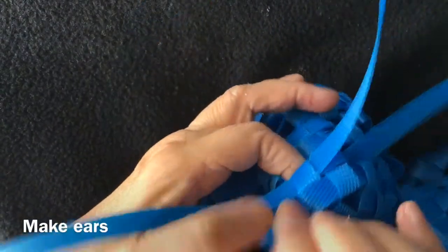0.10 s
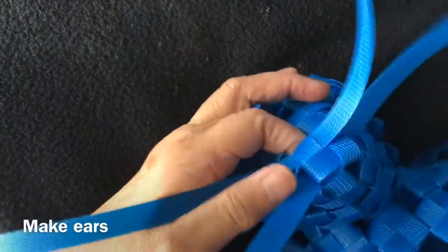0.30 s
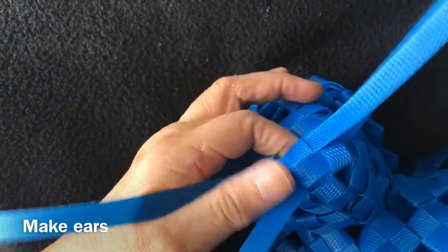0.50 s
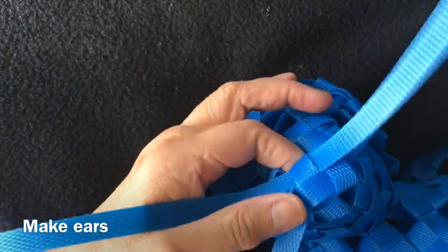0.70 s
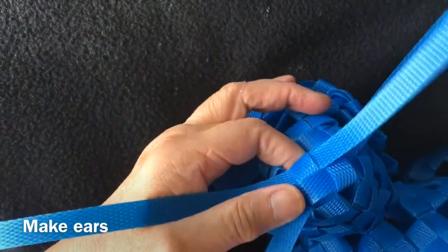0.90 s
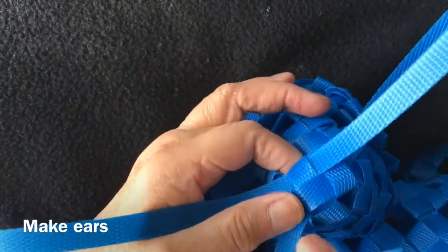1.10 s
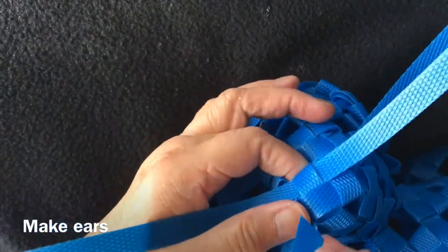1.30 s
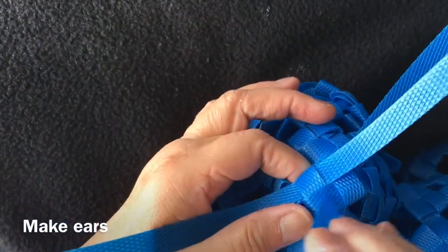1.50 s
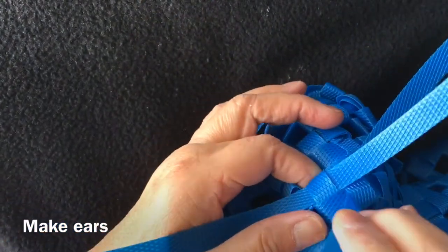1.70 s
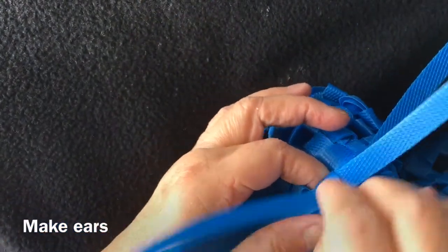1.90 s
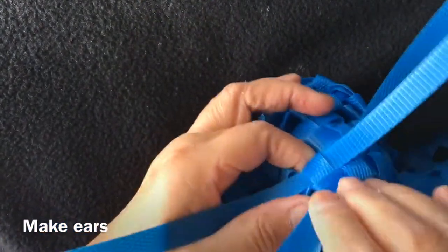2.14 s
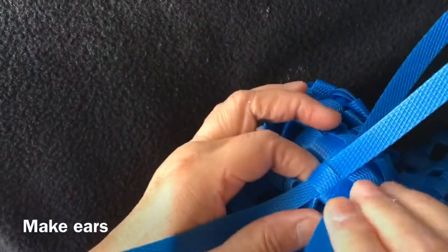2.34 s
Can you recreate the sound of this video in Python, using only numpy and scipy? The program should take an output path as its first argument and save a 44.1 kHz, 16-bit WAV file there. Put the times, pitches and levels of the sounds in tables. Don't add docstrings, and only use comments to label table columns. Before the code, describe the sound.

Ribbed plastic strapping rasps quickly through woven strips, then scattered ticks and a few hard cracks

```python
import sys
import numpy as np
from scipy import signal
from scipy.fft import rfft, irfft
from scipy.io import wavfile
from scipy.ndimage import uniform_filter1d

SR = 44100
rng = np.random.default_rng(int(sys.argv[2]) if len(sys.argv) > 2 else 0)


def wav_record(signal):
    frames = np.transpose(np.atleast_2d(signal))
    bounded = np.clip(frames, -1, 1)
    quanta = np.round(bounded * 32767).astype(np.int16)
    wavfile.write(sys.argv[1], SR, quanta)


def rack_gain(trim_db):
    fader = np.asarray(trim_db, float)
    return 10 ** (fader / 20)


N = 105840

# (mode_hz, width_hz, level_db)
STRIP_MODES = [(1220, 120, 4.5), (1650, 110, -9.5), (2200, 1400, -2.5), (4300, 610, -1.5), (6550, 470, 6),
               (9250, 520, 3)]


def unit_rms(x):
    return x / np.sqrt(np.mean(x ** 2) + 1e-20)


def curve(points, t):
    return np.interp(t, *np.transpose(points))


def coloured(x, points):
    hz = np.fft.rfftfreq(len(x), 1 / SR)
    point_hz, point_db = np.transpose(points)
    gain_db = np.interp(np.log(hz + 1), np.log(point_hz + 1), point_db)
    return irfft(rfft(x) * rack_gain(gain_db), len(x))


def ring(x, hz, width):
    return signal.lfilter(*signal.iirpeak(min(hz, SR / 2.2), hz / width, SR), x)


def wander(count, hz):
    span = int(SR / hz)
    return unit_rms(uniform_filter1d(uniform_filter1d(rng.standard_normal(count), span), span))


def grit(count, spread_db):
    fast_db = spread_db * wander(count, 1500)
    slow_db = .5 * spread_db * wander(count, 100)
    return rng.standard_normal(count) * rack_gain(fast_db + slow_db)


def pull():
    # (time_s, rib_rate_hz)
    rib_rate = [
        (.245, 200),
        (.285, 240),
        (.325, 275),
        (.35, 268),
        (.367, 251),
        (.39, 264),
        (.41, 303),
        (.48, 309),
        (.52, 280),
    ]
    # (time_s, level_db)
    pressure = [
        (.19, -62),
        (.222, -47),
        (.245, -35),
        (.31, -36),
        (.39, -31.5),
        (.49, -35),
        (.542, -39),
        (.553, -50),
        (.562, -43),
        (.574, -56),
    ]
    # (start_s, length_s, [(rib_rate_multiple, level_db)])
    even_catches = [
        (.245, .09, [(2, -43), (3, -44), (5, -48)]),
        (.272, .052, [(1, -39)]),
        (.305, .05, [(2, -45), (4, -43), (6, -39)]),
        (.352, .043, [(3, -43), (5, -39), (7, -42), (8, -42)]),
        (.393, .097, [(2, -39), (4, -39)]),
        (.405, .06, [(6, -43), (7, -39), (8, -46)]),
        (.43, .08, [(1, -49), (9, -47)]),
        (.48, .065, [(2, -50), (3, -48), (5, -44), (6, -45), (7, -44)]),
    ]
    # (hz, level_db)
    scrape_spectrum = [(100, -21), (300, -15), (800, -13), (1300, -6), (2500, -9), (4000, -13),
                       (12000, -16.5), (16000, -20)]
    t = np.arange(N) / SR
    moving = (t > pressure[0][0]) & (t < pressure[-1][0])
    rib_turns = np.cumsum(curve(rib_rate, t) * (1 + .011 * wander(N, 300))) / SR

    buzz = np.zeros(N)
    for start_s, length_s, tones in even_catches:
        swell = np.sqrt(np.sin(np.pi * np.clip((t - start_s) / length_s, 0, 1)) + 1e-9)
        for multiple, level_db in tones:
            level = rack_gain(level_db + 1.2 * wander(N, 50))
            buzz += swell * level * np.cos(2 * np.pi * (multiple * rib_turns + rng.random()))

    slips = grit(N, 1.2) * (1 + 0.37 * np.cos(2 * np.pi * rib_turns))
    slips = slips + sum(rack_gain(db + 4 * wander(N, 50)) * ring(slips, hz, width) for hz, width, db in STRIP_MODES)
    scrape = rack_gain(curve(pressure, t) - 0.04) * unit_rms(coloured(slips, scrape_spectrum))
    return moving * (scrape + buzz)


def struck(s, peak_db, modes):
    lead = 400
    t = (np.arange(1900) - lead) / SR
    lead_in = rack_gain(-35) * np.exp(np.minimum(t, 0) / .003)
    rustle_db = -21 - 0.45 * (peak_db + 32.0)
    rustle = rack_gain(rustle_db) * np.exp(-np.maximum(t, 0) / .0028)
    kick = (t == 0) + rng.standard_normal(len(t)) * np.where(t < 0, lead_in, rustle)
    x = rack_gain(-9) * unit_rms(kick)
    for k, (hz, width, db) in enumerate(sorted(modes)):
        x = x + (-1) ** k * rack_gain(db) * unit_rms(ring(ring(kick, hz, width), hz, width))
    return s - lead / SR, rack_gain(peak_db + 1.0) * x / abs(x).max()


def snap(s, peak_db, ring_hz, body_hz, body_db):
    # (mode_hz, width_hz)
    face_modes = [(2500, 8100), (4200, 900), (6400, 580), (7700, 900), (9400, 1900), (11800, 800),
                  (14500, 1400)]
    detune, uneven_db = .05, 4
    chance = 2 * rng.random((7, 2)) - 1
    modes = [(ring_hz, ring_hz / 4, 2),
             (body_hz, 200 + body_hz / 3, body_db),
             (body_hz / 2, 900, body_db - 14)]
    for (hz, width), (louder, higher) in zip(face_modes, chance):
        modes.append((hz * (1 + detune * higher), 1.7 * width, -4 + uneven_db * louder))
    return struck(s, peak_db, modes)


def rub(start, length, db, tilt_db):
    count = round(length * SR)
    arch = np.sin(np.pi * np.linspace(0, 1, count) ** .7) ** 1.4
    x = grit(8192, 2.1)
    x = x + sum(rack_gain(mode_db - 9 + 7 * wander(8192, 40)) * ring(x, hz, width)
                for hz, width, mode_db in STRIP_MODES)
    x = coloured(x, [(250, -0.5), (1000, -4 - 2 * tilt_db), (4000, -8.0),
                     (9000, -13.5 + tilt_db), (16000, -20.5 + 2 * tilt_db)])
    return start, rack_gain(db) * unit_rms(x)[:count] * arch


def bump(s, db, hz):
    u = np.arange(4000) / SR * hz / 1.8
    return s, rack_gain(db) * np.e * u * np.exp(-u) * np.sin(2 * np.pi * 1.9 * u)


def room(x):
    t60_s = .05
    taps, at = np.zeros(8000), np.arange(100, 7980, 20)
    taps[at + rng.integers(0, 20, len(at))] = rng.choice([-1., 1.], len(at))
    taps *= rack_gain(-60 * np.arange(8000) / SR / t60_s)
    return signal.fftconvolve(x, taps / np.linalg.norm(taps))[:N]


def air():
    # (hz, level_db)
    air_spectrum = [(25, -33), (55, -1), (170, -1), (350, -11.5), (1000, -22.5), (3000, -29.5),
                    (14200, -35.5), (15300, -54)]
    level_db = -66 + wander(N, 21)
    return rack_gain(level_db) * unit_rms(coloured(rng.standard_normal(N), air_spectrum))


def add(mix, s, sound):
    part = mix[round(s * SR):][:len(sound)]
    part += sound[:len(part)]


def scene():
    # (time_s, peak_db,
    # ring_hz, body_hz, body_db)
    pull_snaps = [(.199, -38, 5000, 2200, 4), (.2226, -27, 7300, 1250, 4), (.2272, -19, 10500, 1300, -1),
                  (.2368, -12, 7200, 1500, -5), (.2388, -10.5, 12500, 2800, -1),
                  (.2405, -11, 9500, 1100, 3), (.2435, -16, 6800, 1900, 0), (.36, -23, 9500, 1800, -3),
                  (.367, -23, 10000, 1800, -6), (.383, -21, 6500, 1300, -6), (.387, -13, 6500, 1500, -4),
                  (.395, -16, 9500, 2400, -8), (.4985, -18, 9000, 2000, -3), (.519, -28, 4500, 2000, 0),
                  (.535, -22, 6500, 2000, -8), (.5455, -22, 6500, 1000, -5), (.561, -29, 6000, 1150, 4),
                  (.567, -30, 5000, 2200, 4)]
    weave_snaps = [(0.0748, -44.5, 8700, 2560, 3.5), (.121, -48, 5950, 1450, 14),
                   (0.135, -42.5, 4600, 2450, 11), (0.143, -44, 5600, 1930, 9),
                   (.164, -46, 6000, 2450, -7.5), (0.172, -53.5, 7000, 2970, 4),
                   (0.612, -48, 7050, 1800, -10), (.636, -37.5, 6240, 1570, 14.5),
                   (.698, -46, 5040, 1410, 11), (1.098, -36, 10940, 2050, 2), (1.101, -48, 11000, 1973, 1),
                   (1.2048, -46, 3740, 2540, 11), (1.2221, -33, 5400, 3530, 3),
                   (0.746, -40.5, 5980, 2360, 5), (.776, -41, 5770, 1120, 8),
                   (0.781, -43.5, 6600, 2200, 7.5), (.879, -49.5, 4200, 1740, 9.5),
                   (0.924, -55.5, 4140, 1500, -6), (0.954, -57.5, 6100, 1420, 7),
                   (1.277, -52, 3850, 2200, 0),
                   (1.556, -47.5, 5850, 1210, 4.5), (1.581, -58, 4300, 1150, 10),
                  (1.6224, -48.5, 5800, 1300, 8.5), (1.632, -54, 5930, 1130, 10),
                  (1.646, -54, 4300, 1100, -8), (1.6491, -42, 6170, 1200, 1.5),
                  (1.651, -56, 4300, 1594, -21), (1.657, -65, 7440, 1220, -5),
                  (1.872, -55.5, 6000, 1080, -4), (1.897, -56, 6000, 1060, 6), (2.054, -61, 3950, 1500, 4),
                  (2.081, -56, 9250, 4290, 4), (1.919, -42.5, 7200, 1990, 6.5), (1.929, -64, 6000, 1470, 1),
                  (2.177, -45, 12500, 5500, -19)]
    # (time_s, peak_db, [(mode_hz, width_hz, level_db)])
    cracks = [
        (.6835, -16.5, [(1330, 560, -8.5), (2200, 400, -3.5), (2810, 520, -4.5), (4170, 900, -16), (7080, 2200, 4.5), (11660, 1660, 1), (13400, 1400, -5)]),
        (1.151, -19.5, [(900, 2700, -13.5), (2110, 670, -2.5), (4340, 970, -2.5), (6100, 1070, 1.5), (7400, 1000, -4), (8820, 1400, -7.5), (12100, 1200, -8), (13500, 780, -9)]),
        (1.2115, -20, [(1200, 450, -8), (3050, 330, -7.5), (3970, 870, -4.5), (7140, 970, -14), (9100, 1160, 3), (11060, 1100, -4), (12700, 1600, -7), (15000, 1200, -9)]),
        (2.039, -45.5, [(1220, 1500, -7.5), (3870, 900, -13), (6150, 690, -6.5), (7400, 550, 2), (9400, 600, -18), (11800, 1000, -8), (14100, 1200, -13)]),
        (2.164, -26, [(1220, 570, -14), (2300, 730, -6), (3800, 830, -3), (5710, 650, -2.5), (7100, 540, -8), (8440, 920, -1.5), (9470, 1300, -3), (13850, 2100, 7), (15300, 960, -6)]),
    ]
    # (start_s, length_s, level_db, treble_tilt_db)
    rubs = [(0, 0.078, -67, 2.5), (.06, 0.13, -66, 2), (.108, 0.0634, -57.5, -3), (.185, 0.06, -54, 0.5),
            (.555, 0.12, -58, 0), (.672, 0.044, -49.5, 4), (.71, .035, -65, 5), (.73, 0.12, -65.5, 0),
            (.865, 0.13, -66, 2.5), (1.085, 0.039, -58, -3.5), (1.11, 0.14, -65, 2),
            (1.17, 0.12, -61.5, 5.5), (1.197, 0.037, -46, 2.5), (1.268, 0.064, -63.5, 2.5),
            (1.3, 0.12, -68, 3), (1.565, 0.055, -68.5, 6), (1.615, 0.016, -63, -2.5),
            (1.642, 0.03, -62.5, -0.5), (1.86, 0.037, -66.5, -1), (1.895, 0.06, -60.5, 1),
            (1.95, 0.15, -71.5, 2.5), (2.085, 0.1, -68.5, 1.5), (2.162, 0.032, -66, 4),
            (2.365, 0.051, -70, 3)]
    # (time_s, level_db, pitch_hz)
    bumps = [(.225, -47, 170), (.47, -50, 97), (.49, -52, 62), (.508, -51, 240), (.536, -46, 385),
             (.56, -47, 380), (.55, -51, 138), (.63, -61, 81), (1.095, -57, 380), (1.213, -52.5, 314),
             (1.235, -60, 90), (1.65, -60, 323), (1.918, -53, 319), (1.9, -54.5, 110)]
    still, hands = air(), pull()
    all_snaps = pull_snaps + weave_snaps
    for rows, play in [(rubs, rub), (bumps, bump), (all_snaps, snap), (cracks, struck)]:
        for row in rows:
            add(hands, *play(*row))
    hands = signal.lfilter(*signal.butter(2, 45, "high", fs=SR), hands)
    return (still + hands + rack_gain(-24) * room(hands))[None]


def low_pass(x):
    return signal.sosfilt(signal.butter(12, 16860, fs=SR, output="sos"), x)


def record(dry):
    band_limit = signal.firwin(63, 15900, window=("kaiser", 5), fs=SR)
    return low_pass(signal.oaconvolve(dry, band_limit[None], "same"))


dry = scene()
out = record(dry)
wav_record(out)
```